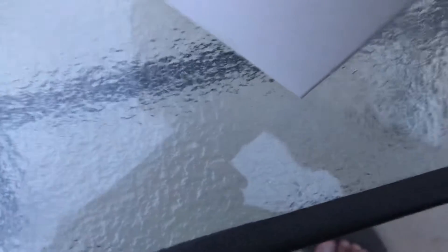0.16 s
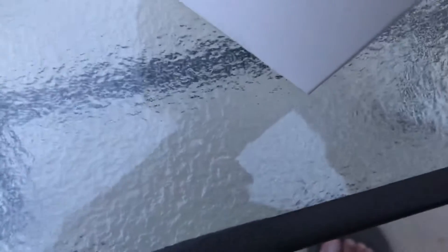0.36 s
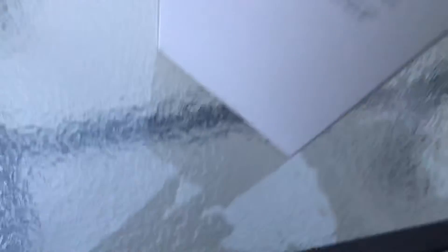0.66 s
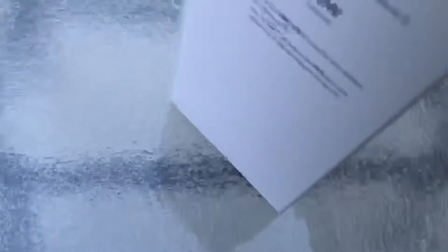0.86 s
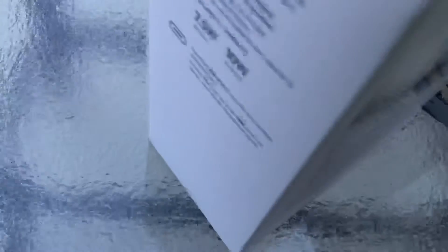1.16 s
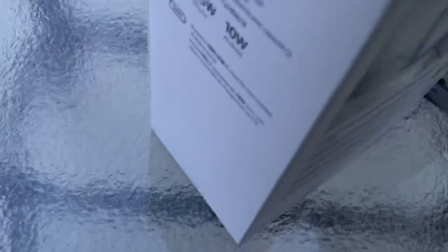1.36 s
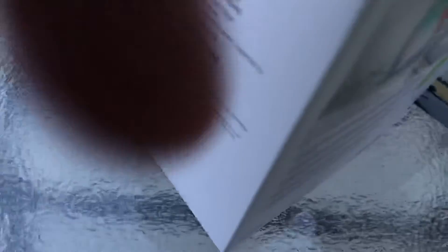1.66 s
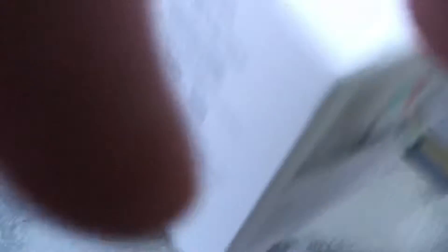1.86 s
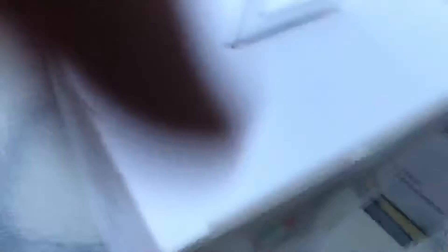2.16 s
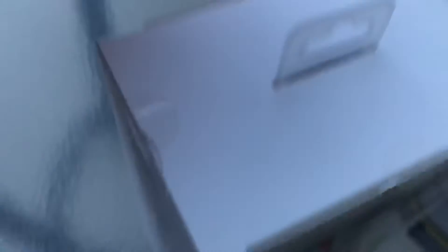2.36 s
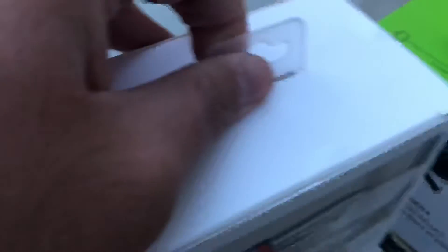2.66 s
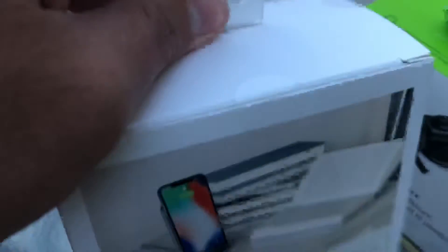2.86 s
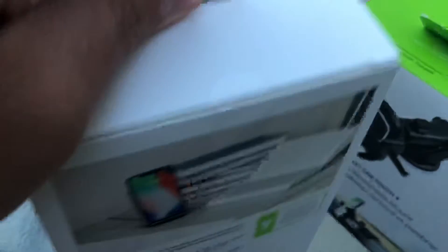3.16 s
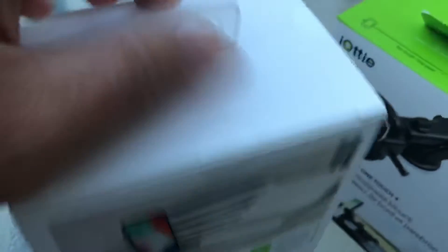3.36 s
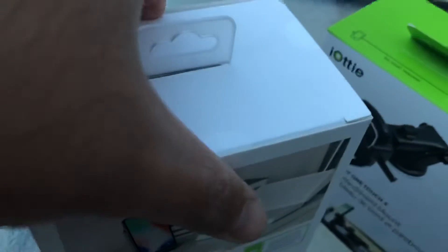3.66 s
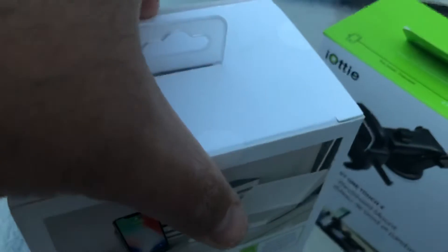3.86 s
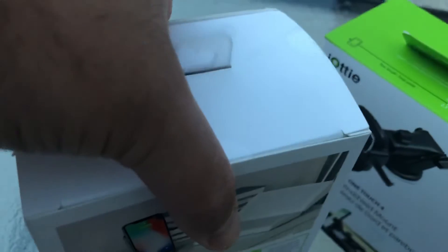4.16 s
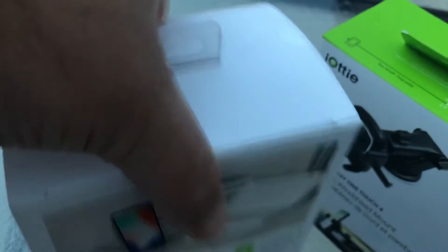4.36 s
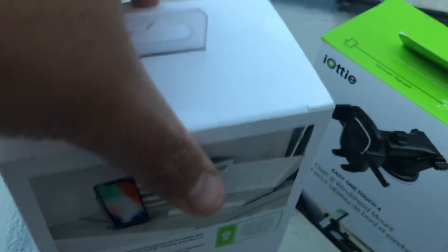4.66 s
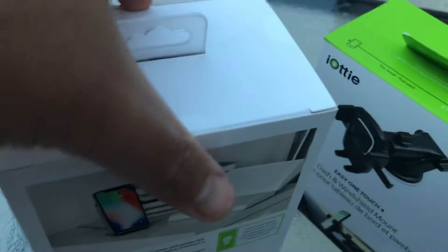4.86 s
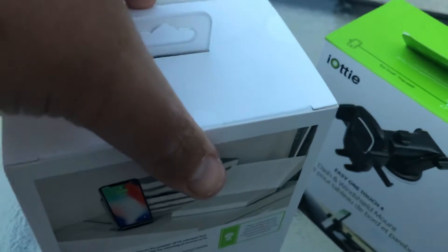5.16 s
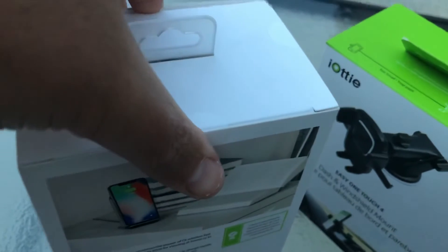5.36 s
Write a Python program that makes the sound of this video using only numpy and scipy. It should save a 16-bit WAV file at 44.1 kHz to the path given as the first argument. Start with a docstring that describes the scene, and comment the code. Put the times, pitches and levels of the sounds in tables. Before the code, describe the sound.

Close, dry card clicks and pops burst irregularly between brief skin rubs and dull thuds, with a quiet low room rumble behind.

```python
"""Skin rubs on card over a far rumble and a faint hum; then card creases snap and soft bumps follow.
Hands turn a thin cardboard box on a glass table, set it down, pull at its plastic tab and pry the lid.
Rubbing is flickering noise, snaps are short bursts through resonances, bumps are damped swings.
The rumble is filtered noise and the hum two wavering sines."""
import sys
import numpy as np
from scipy import signal
from scipy.fft import rfft, irfft, next_fast_len
from scipy.io import wavfile

SR = 44100
rng = np.random.default_rng(int(sys.argv[2]) if len(sys.argv) > 2 else 0)


def int16_out(signal):
    """Quantize to a 16-bit WAV file."""
    q = np.round(np.clip(np.atleast_2d(signal).T, -1, 1) * 32767)
    wavfile.write(sys.argv[1], SR, q.astype(np.int16))


N = 242991

# Far rumble spectrum, relative. Each row: frequency in Hz, density in dB per Hz.
RUMBLE_SPECTRUM = [(25, -6.5), (118, 0), (240, -0.5), (316, -4), (440, -17.5), (760, -14.5), (1110, -20.5),
                   (2500, -23), (8000, -36.5), (16000, -45)]
# Swelling and fading of the hum. Each row: time in seconds, low tone in dB, high tone in dB.
HUM_LEVELS = [(0, -66, -76.5), (3.8, -63.5, -71.5), (3.9, -42, -62.5), (4.05, -45.5, -55),
              (4.1, -40.5, -77), (4.171, -46, -77), (4.249, -77, -78), (4.8, -51.5, -60),
              (5.0, -48.5, -65.5), (5.12, -45, -61.5), (5.179, -43.5, -65.5), (5.3, -52, -83)]
# Strokes of sliding skin and card. Each row: start in seconds, end in seconds, level in dB,
# swell over the stroke in dB, brightness (hiss over rasp) in dB.
STROKES = [(0, 0.132, -56, 3, -7.5), (0.124, 0.239, -48.5, 4.5, -4), (0.271, 0.318, -51, 2, -0.5),
           (0.328, 0.528, -54, 6, -5.5), (1.909, 2.067, -62, -13, -4), (2.186, 2.24, -66.5, -7, -1),
           (2.303, 2.364, -55, -3.5, -6.5), (2.57, 2.701, -55, -19, 6.5), (2.685, 2.795, -62, -9, -4),
           (2.829, 3.015, -64, -1, -0.5), (3.073, 3.155, -59.5, -5.5, 4.5), (3.16, 3.382, -69.5, 8, -6.5),
           (3.373, 3.603, -58.5, -10, -9.5), (3.578, 3.713, -66.5, -4, -11.5), (4.288, 4.311, -37, 6.5, -6),
           (4.338, 4.356, -79, -19.5, -20), (4.487, 4.602, -54, -12, -9.5), (4.567, 4.703, -60, 7, 1),
           (4.75, 4.802, -58.5, -2, -5), (4.831, 4.936, -65.5, -4, -9.5), (4.938, 5.127, -72.5, 0, -2),
           (5.132, 5.283, -64, 6, -3), (5.285, 5.501, -67, -0.5, -5)]
# Snaps and taps of the card. Each row: time in seconds, strength in dB, then the shares of hollow body,
# panel and crisp edge in dB relative to that strength.
SNAPS = [(0.129, -28.5, 7, 4.5, -22), (0.243, -3, -5.5, -8.5, -1), (0.245, -5.5, -8.5, 7, -29),
         (0.294, -29, 0, 13, -29), (0.305, -24.5, 12, -19, -34), (0.485, -39, 1, 10, -35),
         (0.537, -40, -10, -10, 2), (0.589, -29, -25, -2, -9), (0.63, -39, -8, -15, 3),
         (0.657, -35.5, 0.5, 1, -5), (1.407, -18.5, -42, -19, 1.5), (1.424, -42, -18, 2, -30),
         (1.73, -1, -18.5, -8, -18), (1.753, -21.5, -4, 6.5, -32), (1.798, 2.5, -51, -6.5, -26),
         (1.837, 8, -23, -15, -15), (1.856, 2, -26, -5, -30), (1.888, 7.5, -29, -10, -17),
         (1.906, -1, -20.5, -7, -32), (2.57, -16, -9.5, -16, -16), (2.583, -19, 0, -13, -17),
         (2.637, -7, -12, -11.5, -5.5), (2.733, -36, 3, 2, -28), (2.825, -31.5, -2, 0, -28),
         (2.839, -30, -14, -8, -29), (2.864, -26.5, -29, -9, -29), (2.9, -24, -13, -27, -11),
         (2.917, -28, -17, -22, -15), (2.954, -34, 13, 6.5, -20), (2.999, -34, 6.5, -2.5, -20),
         (3.031, -19, -34, -9, 7), (3.037, -17, -16, -15, 8.5), (3.058, -27.5, 5.5, -28, -13),
         (3.162, -34.5, 8.5, -23, -36), (3.206, -34.5, 1, -11, -11), (3.23, -28.5, -11, -4, -17),
         (3.264, -40.5, 10, -4, -20), (3.385, -14.5, 5, -22, -5), (3.396, -18, -13.5, -9, -9),
         (3.435, -19, 2.5, -19, 0), (3.462, -30, 5, -7, -8), (3.488, -17.5, -1.5, -5, 5.5),
         (3.527, -26, 6.5, -17, 7), (3.56, -24.5, -12, -13, -6), (3.645, -33, -3, -18, -13),
         (3.766, -37, -15, -4, -14), (3.93, -34.5, -9, -7.5, -27), (4.063, -41.5, 1, -37, 10.5),
         (4.088, -41, 4, -8, 5), (4.124, -16, -3.5, -2.5, -2), (4.19, -26, -14, -14, -27),
         (4.254, -31.5, -12, -5.5, -22), (4.28, -17.5, 2, -0.5, -14), (4.292, -11, -13, -26, -3.5),
         (4.298, -15, -20, 2, 1), (4.308, -9.5, -34, -6, -20), (4.313, -4, -37, -39, -3.5),
         (4.353, -31, -7, -5, -25), (4.421, -32.5, -5, -4, -37), (4.471, -38.5, 1, -2, -20),
         (4.492, 1.5, -5.5, -4, -10), (4.501, -1, -23, -6.5, -1.5), (4.584, -31.5, 9, 10, -22),
         (4.63, -16, -15, -5.5, -15), (4.707, -28.5, 7.5, 3, -29)]
# Air and walls of the box. Each row: resonance in Hz, width in Hz, relative level in dB.
BODY_MODES = [(150, 60, -20.5), (294, 179, 38), (390, 80, 1), (654, 100, -2.5)]
# Card faces. Each row: resonance in Hz, width in Hz, relative level in dB.
PANEL_MODES = [(831, 190, 0), (1292, 152, 8), (1700, 260, 2), (2017, 140, 13), (2270, 200, -1.5)]
# Folds and flaps. Each row: resonance in Hz, width in Hz, relative level in dB.
CREASE_MODES = [(2850, 120, -2), (3240, 840, 17), (4290, 43, -8), (5070, 330, -13)]
# Strokes with a whistling colour. Each row: start in seconds, end in seconds, centre in Hz,
# width in Hz, level in dB.
SQUEAKS = [(0.143, 0.242, 1700, 205.2, -46.5), (0.346, .41, 3570, 400, -47.5),
           (1.926, 2.059, 2640, 600, -53), (4.645, 4.712, 5130, 1300, -49), (4.84, 4.943, 1920, 444, -54)]
# Soft bumps of hands and table. Each row: time in seconds, relative strength in dB, pitch in Hz,
# decay time (to -60 dB) in seconds.
BUMPS = [(0.311, -25, 150, 0.075), (0.661, -38, 119, 0.032), (0.987, -29, 69.8, 0.035),
         (1.154, -35.5, 107.6, 0.032), (1.199, -22, 150, 0.015), (1.586, -31, 99, 0.016),
         (1.686, -41, 60, 0.059), (2.149, -26.5, 136, 0.074), (2.483, -32, 190, 0.026),
         (3.06, -29, 294, 0.034), (3.388, -27, 240, 0.037), (3.393, -28.5, 370, 0.079),
         (4.494, -27.5, 110, 0.036)]

RUMBLE_DB = -50
HUM_HZ = 204.3, 580   # low and high tone, unrelated
SCRAPE_DB, SCRAPE_PER_BRIGHT = -3, -1.04   # low-mid scrape: the duller the stroke, the stronger
RATTLE_DB, RATTLE_T60_S = -41.5, 0.12   # torn fibres rattle on after a snap, relative to its strength
RATTLE_SCRAPE_DB, RATTLE_TREBLE_DB = 17.5, -4.5   # over the panel and edge shares of that snap
FAINT_PER_S, FAINT_DB, FAINT_SPREAD_DB = 15, 22, 9   # faint ticks: rate, level over the stroke, spread
FAINT_SHARES_DB, SHARE_SPREAD_DB = (-9, -8, -16), 4   # their body, panel and edge shares
SNAP_T60_S, T60_DB_PER_DB = .03, 0.2849   # decay of a 0 dB burst; weaker ones die sooner
BENDING_LAG_S = 0.001113   # arrival lag of a 1 kHz bending wave, for one passage
SWELL_S, SWELL_WIDTH_S, SWELL_DB = 5.08, .25, -48   # centre, spread and peak of the rumble's swell
ROOM_T60_S, ROOM_DB = 0.077, -18.5
CUTOFF_HZ = 17400


def from_db(db):
    """Logarithmic level: 20 dB is a factor of ten in amplitude."""
    return 10 ** (np.asarray(db) / 20)


def rms_one(x):
    """Normalization by the root mean square, to rms 1."""
    return x / np.sqrt(np.mean(x ** 2) + 1e-20)


def band(x, low_hz, high_hz):
    """Band limitation by a Butterworth response, flat within the passband."""
    edges_hz = [low_hz, min(high_hz, .45 * SR)]
    return signal.sosfilt(signal.butter(2, edges_hz, "band", fs=SR, output="sos"), x)


def drift(rate):
    """Slow random fluctuation: noise through two equal low-pass poles at a rate in Hz, rms 1."""
    r = np.exp(-80 * np.pi * rate / SR)   # one value every 40 samples
    noise = rng.standard_normal(N // 40 + 2002)
    slow = signal.lfilter([1], [1, -2 * r, r * r], noise)[2000:]
    return np.interp(np.arange(N) / 40, np.arange(len(slow)), rms_one(slow))


def resonate(x, modes, direct_db):
    """Modal superposition: parallel resonances of alternating sign plus direct sound; white noise keeps its rms."""
    top_db = max(db for hz, width, db in modes)
    click = np.arange(N) == 0   # a unit click gauges the power of the response
    x = np.stack([x + 1e-18, click])
    out = from_db(direct_db) * x
    for k, (hz, width, db) in enumerate(modes):
        r = np.exp(-np.pi * max(width, 10) / SR)
        poles = [1, -2 * r * np.cos(2 * np.pi * hz / SR), r * r]
        zeros = np.array([1, 0, -1]) * (1 - r * r) / 2
        out = out + (-1) ** k * from_db(db - top_db) * signal.lfilter(zeros, poles, x)
    sound, response = out
    return sound / np.sqrt(np.sum(response ** 2))


def crackle(spread_db):
    """Fracture noise: fibres give way in a dense train of uneven micro-clicks; rms 1."""
    size_db = spread_db * np.minimum(rng.exponential(1, N), 4)
    return rms_one(from_db(size_db) * rng.standard_normal(N))


def bend(x):
    """Dispersion: bending waves in card and glass lag as one over the root of frequency."""
    size = next_fast_len(N + SR // 4)
    hz = np.arange(size // 2 + 1) * SR / size
    phase = -4 * np.pi * BENDING_LAG_S * np.sqrt(1000 * hz)
    return irfft(rfft(x, size) * np.exp(1j * phase), size)[:N]


def coloured(spectrum):
    """Spectral synthesis: half-octave noise bands, each weighted by the spectrum; rms 1."""
    out, edges = 0, 25 * 2 ** np.arange(0, 9.6, .5)
    white = rng.standard_normal((2, N))   # neighbouring bands use different noise
    hz, db = np.transpose(spectrum)
    for k, (low, high) in enumerate(zip(edges, edges[1:])):
        level_db = np.interp(np.log(low * high) / 2, np.log(hz), db)
        out = out + from_db(level_db) * band(white[k % 2], low, high)
    return rms_one(out)


def rumble():
    """Amplitude modulation of random noise: a wavering far rumble, lumpy in its deepest band."""
    far = from_db(RUMBLE_DB) * coloured(RUMBLE_SPECTRUM) * from_db(1.2 * drift(2.9))
    deep = rms_one(band(rng.standard_normal(N), 40, 130))
    return far + from_db(-58 + 4 * drift(6)) * deep


def hum():
    """Harmonic oscillation with random modulation: two sines that waver in phase and level."""
    t = np.arange(N) / SR
    s, *levels = np.transpose(HUM_LEVELS)
    out = np.zeros(N)
    for hz, level_db in zip(HUM_HZ, levels):
        gain = from_db(np.interp(t, s, level_db) + 2.0 * drift(9.0))
        out += gain * np.sin(2 * np.pi * hz * t + .6 * drift(4.8))
    return out


def rub():
    """Friction excitation: sliding skin hisses; sliding card drives the box with rough grains and stray ticks."""
    gains = np.zeros((3, N))   # scrape, rasp, hiss
    for start, end, level_db, swell_db, bright_db in STROKES:
        span = slice(round(start * SR), round(end * SR))
        press_db = level_db + swell_db * np.linspace(-.5, .5, span.stop - span.start)
        shares_db = np.c_[[SCRAPE_DB + SCRAPE_PER_BRIGHT * bright_db, 0, bright_db]]
        gains[:, span] += from_db(press_db + shares_db)
    # the rattle after each snap
    fade_db = RATTLE_DB - 60 * np.arange(round(RATTLE_T60_S * SR)) / SR / RATTLE_T60_S
    for s, peak_db, body_db, panel_db, edge_db in SNAPS:
        shares_db = np.c_[[panel_db + RATTLE_SCRAPE_DB, 0, edge_db + RATTLE_TREBLE_DB]]
        start = round(s * SR)
        gains[:, start:start + len(fade_db)] += from_db(peak_db + fade_db + shares_db)
    ease = np.exp(-1 / (.005 * SR))   # contact makes and breaks within a few ms
    gains = signal.lfilter([1 - ease], [1, -ease], gains)
    strikes = (rng.random(N) < 90 / SR) * rng.exponential(.7, N)   # 90 a second on average
    ticks = signal.lfilter([1], [1, -.985], strikes)
    uneven = from_db(1.5 * drift(40.0)) * (1 + ticks)
    scrape = band(resonate(crackle(spread_db=3.0), PANEL_MODES + BODY_MODES, direct_db=-15.0), 500, 1800)
    rasp = band(resonate(crackle(spread_db=3.5), CREASE_MODES, direct_db=-10), 1300, 6000)
    hiss = band(band(rng.standard_normal(N), 5500, 25000), 2800, 12000)
    layers = [rms_one(layer) * from_db(2.0 * drift(12.0)) for layer in (scrape, rasp, hiss)]
    return uneven * np.sum(gains * layers, axis=0)


def faint_ticks():
    """Random fracture: small creases give way during a stroke, their mean level following its pressure."""
    rows = []
    for start, end, level_db, swell_db, bright_db in STROKES:
        when, keep, *chance = rng.random((8, 6)).T   # up to eight ticks a stroke
        places = when[keep < FAINT_PER_S * (end - start) / 8]
        for place, (size, *shares) in zip(places, np.transpose(chance)):
            press_db = level_db + swell_db * (place - .5)
            peak_db = press_db + FAINT_DB + FAINT_SPREAD_DB * (2 * size - 1)
            shares_db = np.add(FAINT_SHARES_DB, SHARE_SPREAD_DB * (2 * np.array(shares) - 1))
            s = min(start + place * (end - start), N / SR - .1)
            rows.append((s, peak_db, *shares_db))
    return rows


def snaps():
    """Impulsive excitation of modes: a hard tick and fast-dying crackle drive body, faces, folds and edge."""
    body, panel, crease, edge = np.zeros((4, N))
    grains, fine = crackle(spread_db=1.5), crackle(spread_db=-1.0)
    t = np.arange(round(.08 * SR)) / SR
    for s, peak_db, body_db, panel_db, edge_db in SNAPS + faint_ticks():
        start = round(s * SR)
        span = slice(start, start + len(t))
        fall_db = -60 * t / (SNAP_T60_S * from_db(T60_DB_PER_DB * peak_db))
        force = from_db(peak_db) * (1 + 0.44 * np.exp(-t / 0.0003))
        burst = force * np.r_[4.0, grains[span][1:]]   # the first break is always hard
        body[span] += from_db(body_db + 0.44 * fall_db) * burst   # the hollow body rings longest
        panel[span] += from_db(panel_db + 1.2 * fall_db) * burst
        crease[span] += from_db(fall_db) * burst
        edge[span] += from_db(edge_db + 1.2 * fall_db) * force * fine[span]
    hollow = band(resonate(body, BODY_MODES, direct_db=-7.5), 150, 800)
    faces = band(band(resonate(panel, PANEL_MODES, direct_db=-13), 550, 2200), 420, 4700)
    folds = band(resonate(crease, CREASE_MODES, direct_db=-5), 2430, 5760)
    crisp = band(edge, 4700, 16500)
    walls = from_db(6.0) * hollow + from_db(-3) * faces
    return bend(walls) + from_db(-9.5) * folds + from_db(-10) * crisp


def squeaks():
    """Resonant selection: noise passes twice through a narrow band, swelling and fading over the stroke."""
    out = np.zeros(N)
    for start, end, hz, width, db in SQUEAKS:
        span = slice(round(start * SR), round(end * SR))
        narrow = band(crackle(spread_db=-2.0), hz - width / 2, hz + width / 2)
        tone = rms_one(band(narrow, hz - width, hz + width))
        out[span] += from_db(db) * tone[span] * np.hanning(span.stop - span.start)
    return out


def bumps():
    """Damped oscillation: a soft push swings low and spreads by dispersion through the table."""
    out, t = np.zeros(N), np.arange(round(.25 * SR)) / SR
    for s, peak_db, hz, t60 in BUMPS:
        lead_s = 1.5 * BENDING_LAG_S * np.sqrt(1000 / hz)   # offsets most of the travel lag
        start = round((s - lead_s) * SR)
        swing = np.sin(2 * np.pi * hz * t) * (1 - np.exp(-t / 0.00092))
        out[start:start + len(t)] += from_db(peak_db + 7.0 - 60 * t / t60) * swing
    return bend(bend(out))   # two passages: a long way


def swell():
    """Gaussian amplitude envelope: a band of low rumble rises and fades once."""
    shape = np.exp(-.5 * ((np.arange(N) / SR - SWELL_S) / SWELL_WIDTH_S) ** 2)
    low = band(band(rng.standard_normal(N), 163, 280), 130, 384)
    return from_db(SWELL_DB) * shape * rms_one(low)


def space(x):
    """Reverberation by convolution: a short, diffuse, exponentially decaying tail, dull in the treble."""
    t = np.arange(round(ROOM_T60_S * SR)) / SR
    noise = band(rng.standard_normal(SR), 200, 5000)[:len(t)]
    tail = noise * from_db(-60 * t / ROOM_T60_S) * (t > .004)   # starts after 4 ms
    return signal.fftconvolve(x, tail / np.sqrt(np.sum(tail ** 2)))[:N]


def scene():
    """Linear superposition: box, hands and surroundings add at one microphone."""
    box = rub() + snaps() + squeaks()
    surroundings = rumble() + hum() + swell()
    return (box + from_db(ROOM_DB) * space(box) + bumps() + surroundings)[None]


def record(dry):
    """Band limitation and clipping: a small microphone drops the deepest bass, clips peaks, cuts the top."""
    thin = signal.sosfilt(signal.butter(3, 42.0, "high", fs=SR, output="sos"), dry)
    clipped = np.clip(thin, -.9, .9)
    return signal.sosfilt(signal.cheby2(12, 70, CUTOFF_HZ, fs=SR, output="sos"), clipped)


dry = scene()
out = record(dry)
int16_out(out)
```